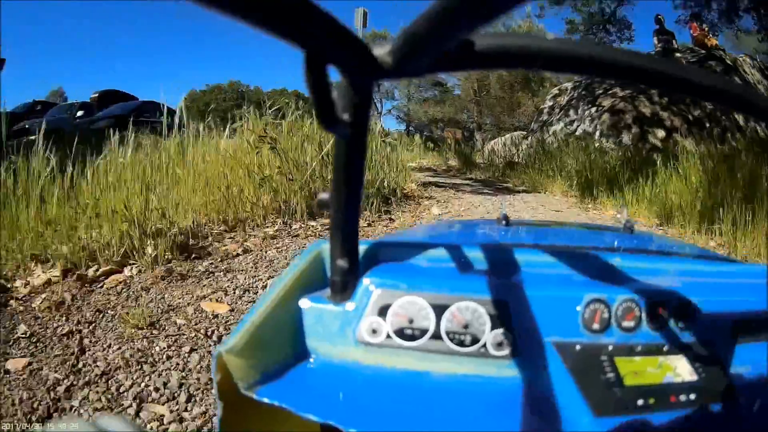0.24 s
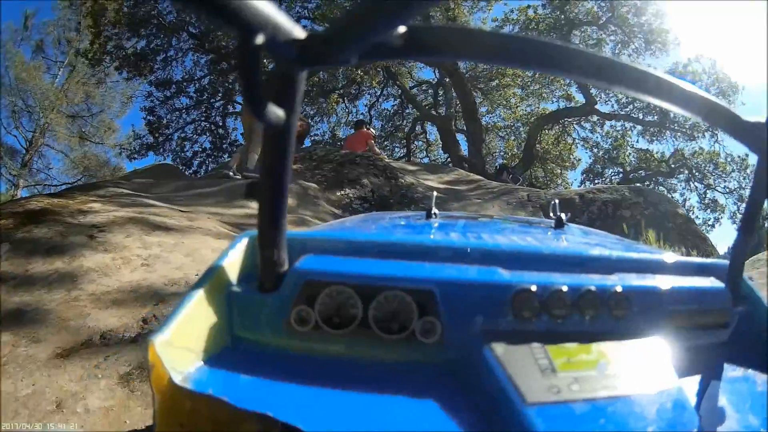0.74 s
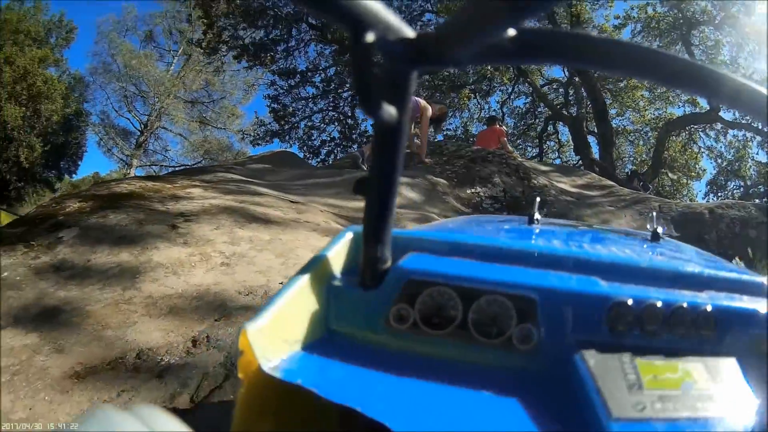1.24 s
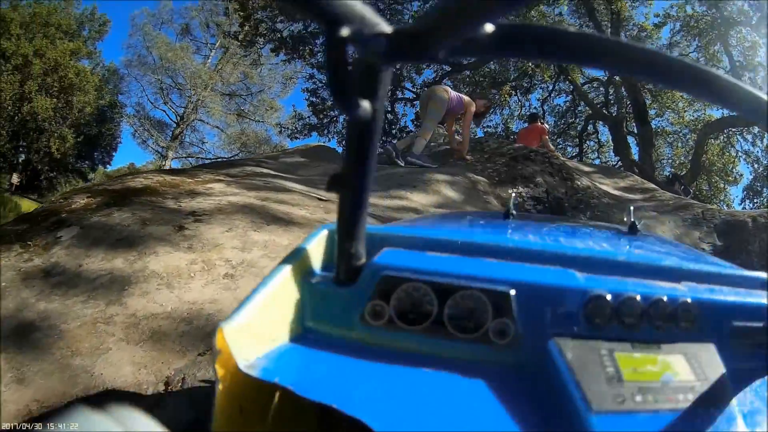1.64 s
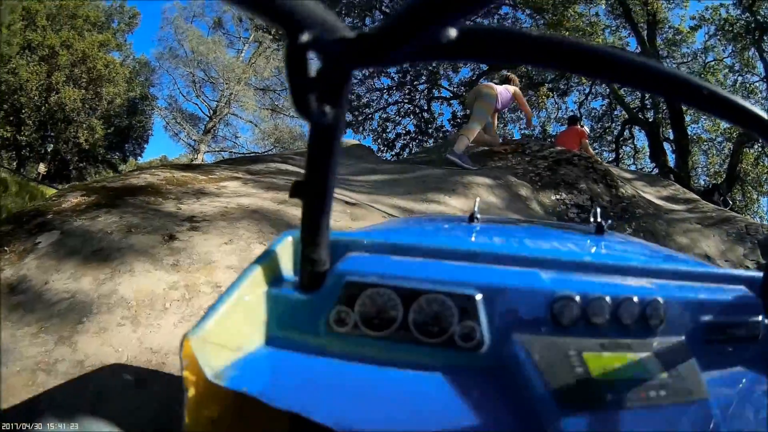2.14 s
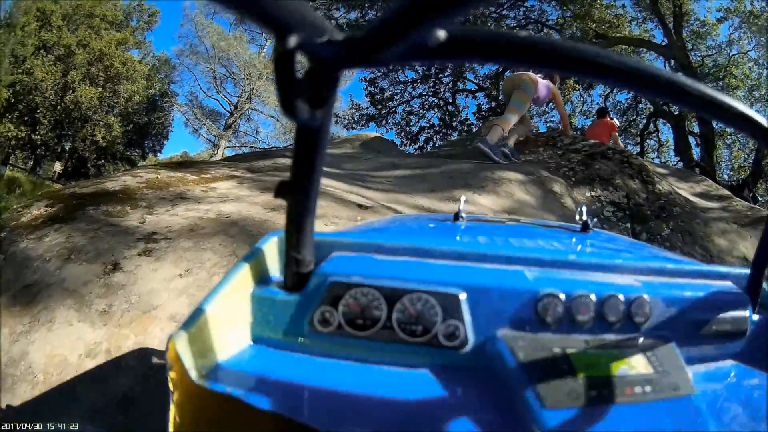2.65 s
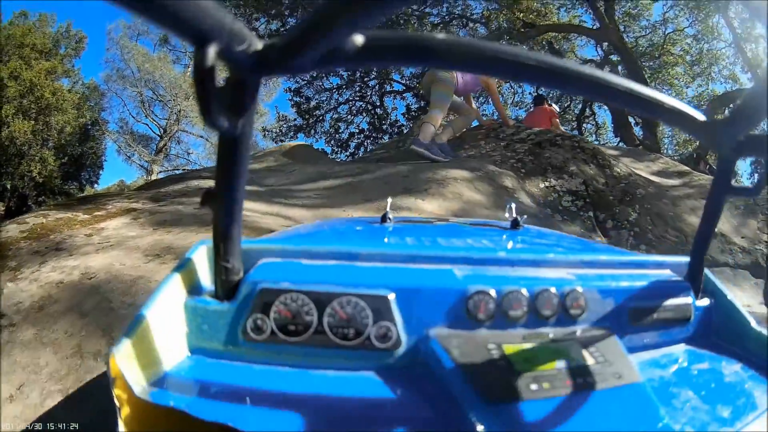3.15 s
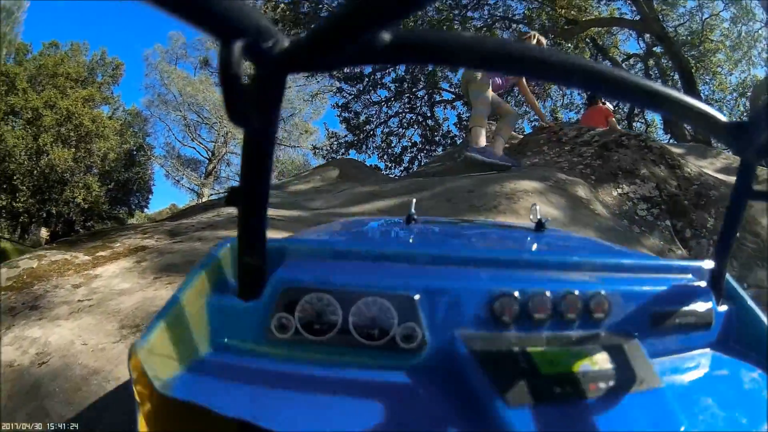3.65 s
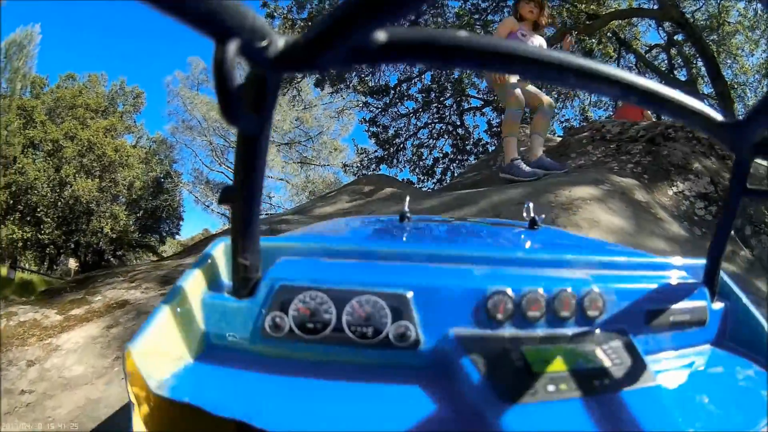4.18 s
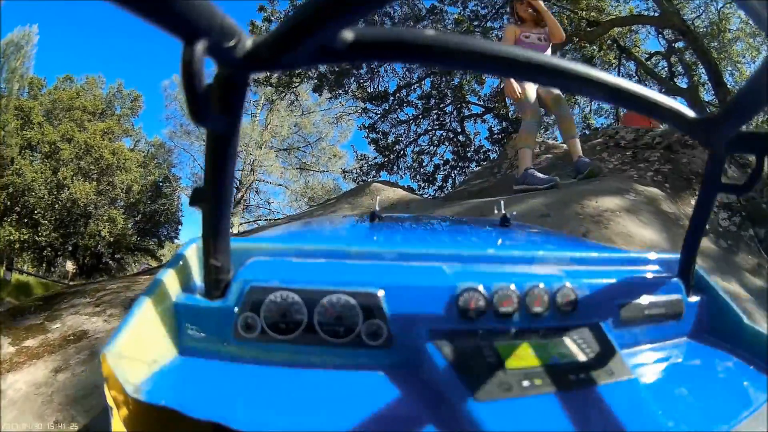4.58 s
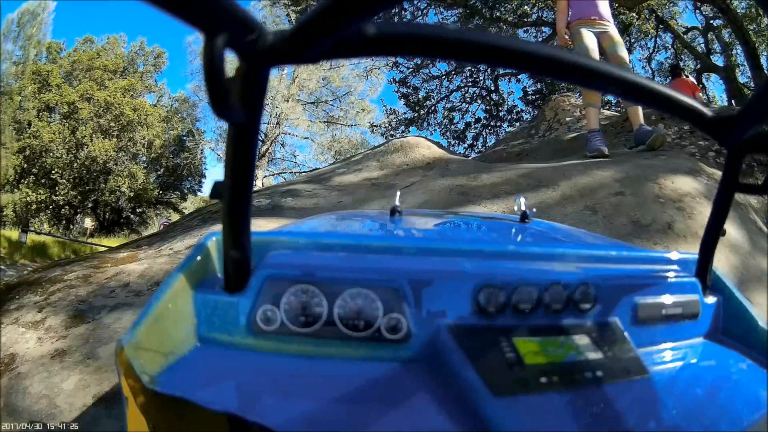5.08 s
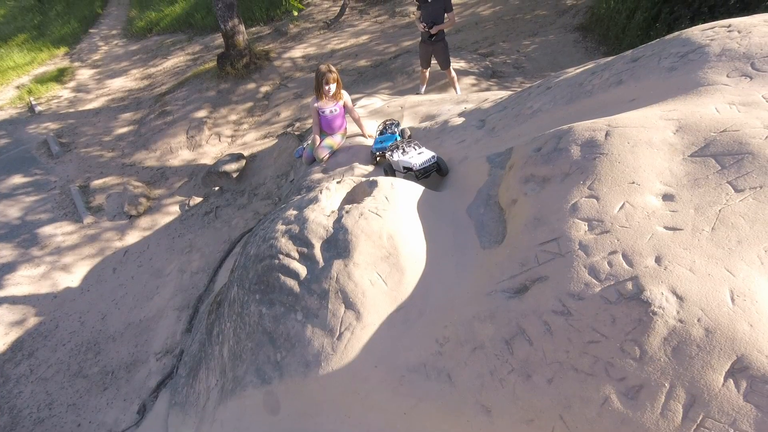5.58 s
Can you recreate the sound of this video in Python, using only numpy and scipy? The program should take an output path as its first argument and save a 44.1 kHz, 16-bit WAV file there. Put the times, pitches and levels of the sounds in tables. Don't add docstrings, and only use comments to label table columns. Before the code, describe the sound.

A small electric model crawler whirs harshly over gravel, then whines in a warbling, surging pitch up rock, then drops to a faint distant hum.

```python
import sys
import numpy as np
from scipy import signal
from scipy.fft import rfft, irfft, next_fast_len
from scipy.io import wavfile
from scipy.ndimage import uniform_filter1d, minimum_filter1d, map_coordinates

SR = 44100
rng = np.random.default_rng(int(sys.argv[2]) if len(sys.argv) > 2 else 0)


def put_to_file(sound):
    columns = np.atleast_2d(sound).T
    safe = np.clip(columns, -1, 1)
    whole_steps = np.round(safe * 32767)
    wavfile.write(sys.argv[1], SR, whole_steps.astype(np.int16))


def amplitude_ratio(level_db):
    exponent = np.asarray(level_db, float) / 20
    return 10 ** exponent


N = 256657
T = np.arange(N) / SR

# start in seconds, end in seconds.
SHOTS = [
    (0, .419),
    (.419, 5.151),
    (5.151, 5.83),
]
# time in seconds, mean tooth rate in Hz, swing within a shaft turn (0-1).
CLIMB = [(0.419, 556.8, .145), (0.701, 625.7, .136), (1.037, 588.2, .186), (1.145, 528.6, .167),
         (1.488, 680.7, .164), (1.903, 658.7, .163), (2.214, 719.8, .157), (2.6, 882.6, .146),
         (3.244, 915.0, .176), (3.526, 796.6, .169), (3.975, 852.0, .153), (4.38, 709.7, .138),
         (4.544, 787.5, .144), (4.806, 886.8, .152), (5.016, 796.0, .16), (5.15, 818.0, .15),
         (5.151, 553, .145)]
# time in seconds, tooth load in dB, winding song in dB.
EFFORT = [(0.0, -2, -65), (0.41, -3.5, -50), (0.425, -1, -46), (1.18, -0.2, -44), (1.3, 1, -50.5),
          (2.45, 1, -51.5), (3.1, -2, -51.5), (3.8, 0.4, -50.5), (5.14, -1.1, -51.5), (5.16, -4, -71),
          (5.8, -4.5, -67)]


def along(points, hz):
    f, v = np.transpose(points)
    return np.interp(np.log(hz + 1), np.log(f + 1), v)


def unit(x):
    return x / np.sqrt(np.mean(x ** 2) + 1e-20)


def wobble(rate):
    coarse = T[::16]
    knots = rng.standard_normal(int(N * rate / SR) + 4)
    return np.interp(T, coarse, map_coordinates(knots, [coarse * rate]))


def filtered(x, response):
    m = next_fast_len(N + 8192)
    return irfft(rfft(x, m) * response(np.fft.rfftfreq(m, 1 / SR)), m)[..., :N]


def by_shot(values):
    return sum(((T >= a) & (T < b)) * v for (a, b), v in zip(SHOTS, values))


def column(rows, index):
    return np.interp(T, *np.transpose(rows)[[0, index]])


def tone(hz, db):
    return np.sqrt(2) * amplitude_ratio(db) * np.sin(2 * np.pi * (np.cumsum(hz * np.ones(N)) / SR + rng.random()))


def worn(line_hz, db, wear, rate):
    turn = 2 * np.pi * (np.cumsum(line_hz * np.ones(N)) / SR + rng.random())
    in_phase = (1 + wear * wobble(rate)) * np.sin(turn)
    quadrature = wear * wobble(rate) * np.cos(turn)
    return amplitude_ratio(db) * (in_phase + quadrature) / np.sqrt(.5 + wear ** 2)


def coloured(drive, spectra, lo_hz, hi_hz):
    bins_hz = np.fft.rfftfreq(4096, 1 / SR)
    inside = (bins_hz > lo_hz) & (bins_hz < hi_hz)
    layers = []
    for spectrum in spectra:
        power = np.sum(amplitude_ratio(along(spectrum, bins_hz)[inside]) ** 2) / len(bins_hz)
        layers.append(filtered(drive, lambda hz: amplitude_ratio(along(spectrum, hz))) / np.sqrt(power))
    return by_shot(layers)


def pace():
    # time in seconds, twice the tooth rate in Hz.
    sprint = [
        (0.0, 3200),
        (0.12, 3100),
        (0.175, 2920),
        (0.21, 3150),
        (0.255, 3320),
        (0.28, 3050),
        (0.335, 2880),
        (0.4, 3020),
        (0.419, 3080),
    ]
    return np.where(T < SHOTS[1][0], column(sprint, index=1) / 2, column(CLIMB, index=1))


def tooth_rate():
    start_turns = (0, -.063, -.19)
    flutter = (.025, .006, .003)
    teeth_per_turn, lopsided, lopsided_rad = 113.393, .0185, -1.34
    mean = pace()
    turns = np.cumsum(mean) / SR / teeth_per_turn
    since_cut = [turns - turns[round(a * SR)] + at for (a, b), at in zip(SHOTS, start_turns)]
    angle = 2 * np.pi * by_shot(since_cut)
    swing = lopsided * np.cos(2 * angle + lopsided_rad) - column(CLIMB, index=2) * np.cos(angle)
    on_rock = T >= SHOTS[1][0]
    return mean * (1 + on_rock * swing + by_shot(flutter) * wobble(45))


def frame_db(hz):
    # centre in Hz, width in Hz, gain in dB.
    chassis = [(500, 120, -0.5), (590.5, 33, 0), (871, 72, 4.5), (1098, 101, 4), (1319.5, 78, 0),
               (1598, 114, -2), (1922, 208, 2), (2400, 108, -3.5), (2864, 150, -1), (3326, 357, 2.5),
               (4540, 160, 4)]
    modes = sum(amplitude_ratio(db) ** 2 / (1 + (2 * (hz - c) / w) ** 2) ** 1.213 for c, w, db in chassis)
    return 10 * np.log10(modes / (1 + (hz / 3600) ** 12))


def gears(rate, distance_db):
    # multiple of the tooth rate, level in dB, wear as sideband depth.
    orders = [(.25, -33, .6), (1, -28.5, .4), (2, -26, .4), (3, -35.5, .5), (4, -42, .6), (5, -44, .8),
              (6, -46, 1.0)]
    load_db = column(EFFORT, index=1) + distance_db
    shake = by_shot([5, 1.01, .4])
    whine = 0
    for k, db, wear in orders:
        level_db = db + load_db + frame_db(k * rate) + 2 * wobble(20)
        whine = whine + worn(k * rate, level_db, wear * shake, 200)
    return whine


def windings(rate, distance_db):
    # multiple of the switching rate, level in dB.
    overtones = [(1, -37.5), (2, -44), (5, -83), (8, -62.5)]
    switch_hz = 979.3
    slot_hz = .152 * rate
    lines = sum(tone(k * switch_hz, db + distance_db + 3.0 * wobble(5.44)) for k, db in overtones)
    sixth = tone(6 * switch_hz, column(EFFORT, index=2) + 1.42 + 1.0 * wobble(24.6))
    below = worn(switch_hz - slot_hz, by_shot([-55, -33, -70]), 0.14, 70)
    above = worn(switch_hz + slot_hz, by_shot([-55, -42, -74]), 0.07, 70)
    far_song = tone(5911 + 12 * wobble(9), by_shot([-99, -99, -72]) + 3 * wobble(12))
    return lines + sixth + below + above + far_song


def noise_db(index):
    # rumble in dB, shell in dB, rattle in dB.
    levels = [
        (-34.5, -28.5, -37.5),
        (-42.5, -37.5, -47),
        (-54, -62.5, -68),
    ]
    grows_db = (4, 3, 5)
    cruise_hz = (1550, 700, 553)
    return by_shot(np.transpose(levels)[index]) + grows_db[index] * np.log2(pace() / by_shot(cruise_hz))


def body(rate):
    # frequency in Hz, density in dB per Hz.
    rumble_colour = [
        [(13, -33), (22, 6), (69, 3.5), (139, 3.5), (188, 3), (411, 4.5), (500, 0), (650, -33), (1100, -120)],
        [(13, -44), (22, -41), (54, -1.5), (146, -15), (228, -7), (375, -5), (500, -12), (650, -26),
         (1100, -120)],
        [(13, -51), (22, -17), (98, -33), (134, -7), (150, 1), (167, -4), (300, -13), (500, -30), (650, -48),
         (1100, -120)],
    ]
    shell_colour = [
        [(210, -38), (350, -1), (410, -5), (754, -5.5), (873, -6.5), (1000, 0), (1440, 0), (1540, -13),
         (1860, 2.5), (2390, -10.5), (2990, 0.5), (4100, -20.5), (5200, -33.5), (6760, -54), (11400, -120)],
        [(210, -24), (350, -15.5), (538, -12.5), (754, -8), (883, -2), (1120, -3.5), (1200, -6), (1970, -7.5),
         (2160, -13.5), (3310, -19), (4100, -36), (4490, -30.5), (5200, -38), (6760, -66), (11400, -120)],
        [(210, -42), (350, -3), (569, 2), (826, -5), (967, 1.5), (1660, -6.5), (1950, 0), (2280, -10.5),
         (3020, -10.5), (5200, -22), (6760, -58), (11400, -120)],
    ]
    rattle_colour = [
        [(2650, -52), (4500, -24), (5050, -15), (5990, -0.5), (6870, -11), (8820, -0.5), (10400, -12),
         (12300, -13.5), (13600, -20), (14900, -23), (15600, -39)],
        [(3500, -44), (4800, -22), (5900, -8.5), (6870, -13.5), (7900, -6.5), (9080, -1), (10400, -16.5),
         (11300, -13.5), (13000, -17.5), (14500, -21), (15600, -60)],
        [(3500, -28), (5000, -9), (6200, 4), (12500, -3.5), (14000, -7), (15300, -8), (15700, -30)],
    ]
    lead_s = 0.0034
    near = by_shot([.3, 1.01, .1])
    octaves = np.roll(np.log2(rate / pace()), -round(lead_s * SR))
    surge = near * np.clip(octaves, -.35, .35)

    rumble_db = noise_db(index=0) + 0.92 * surge + 0.74 * wobble(14)
    rumble = coloured(rng.standard_normal(N), rumble_colour, 40, 700) * amplitude_ratio(rumble_db)

    buzz = unit(rng.standard_normal(N) * amplitude_ratio(1.3 * near * wobble(120)))
    shell_db = noise_db(index=1) - 2.5 + 8.8 * surge + 0.65 * wobble(25.3)
    shell = coloured(buzz, shell_colour, 2050, 3260) * amplitude_ratio(shell_db)

    ticks = (rng.random(N) < .008) * rng.standard_normal(N) * amplitude_ratio(1.3 * rng.exponential(size=N))
    hiss = rng.standard_normal(N) * amplitude_ratio(2.04 * near * wobble(150))
    grit = unit(hiss + 0.51 * near * unit(ticks))
    rattle_db = noise_db(index=2) + 8.6 * surge + 0.22 * near * wobble(30)
    rattle = coloured(grit, rattle_colour, 7670, 10700) * amplitude_ratio(rattle_db)
    return rumble + shell + rattle


def squeaks():
    # time in seconds, peak level in dB, length in ms, pitch in Hz.
    chirps = [(0.017, -18, 1.5, 8900), (0.068, -24, 1.5, 8300), (0.086, -22, 1.9, 11760),
              (0.095, -21, 2, 8900), (0.138, -19, 7.1, 8650), (0.159, -33, 2, 11300),
              (0.236, -14, 0.76, 8570), (0.259, -35, 1.8, 8760), (0.308, -24, 1.6, 10900),
              (0.312, -25, 2.2, 8200), (0.384, -22, 0.74, 8500), (1.09, -37, 1.9, 10700),
              (2.135, -32, 3, 8900), (2.253, -33, 1.7, 7940), (2.438, -37, 3.4, 10100),
              (2.57, -40, 2.1, 13850), (2.71, -30, 7.2, 14200), (2.954, -30, 4.5, 8470),
              (3.178, -23.5, 6.5, 8500), (3.203, -59, 2.3, 9270), (3.327, -29.5, 4.9, 9200),
              (4.018, -23, 2.2, 14200), (4.317, -27, 8.5, 14400), (4.617, -26, 8.5, 14200),
              (4.719, -37.5, 6.0, 7210), (4.735, -35, 2.1, 14420), (4.759, -38, 1.2, 4870),
              (4.879, -33, 9, 13700), (5.356, -48, 2.3, 2900), (5.76, -55, 1.5, 5000)]
    rise_hz, droop_hz = 222, -70
    snap_level = 2.4
    out, t = np.zeros(N + 4096), np.arange(-2048, 2048) / SR
    for s, db, ms, hz in chirps:
        life, sags = ms / 1000, hz > 13000
        glide = (droop_hz if sags else rise_hz) * t * t / life
        sag = sags * 600 * t ** 3 / (3 * life ** 2)
        phase = 2 * np.pi * (hz * t + glide + sag)
        chirp = np.exp(-np.where(sags, 2.2, 2.8) * (t / life) ** 2) * np.sin(phase)
        snaps = ms < 2.6 and not sags
        noise = uniform_filter1d(rng.standard_normal(4096), size=12)
        snap = snaps * snap_level * np.exp(-5 * (t / life) ** 2) * noise * np.cos(phase)
        out[round(s * SR):][:4096] += amplitude_ratio(db + 3.0) * (chirp + snap)
    return filtered(out[2048:][:N], lambda hz: 1 / np.sqrt(1 + (hz / 13500) ** 8 + (2600 / (hz + 1)) ** 8))


def servo():
    # time fastest in seconds, half length in seconds, top pitch in Hz, fall in Hz.
    s, half, top_hz, fall_hz = (.903, .05, 2150, 1050)
    u = np.clip((T - s) / half, -1, 1)
    pitch = top_hz - fall_hz * np.sin(np.pi * u / 2) ** 2
    # frequency in Hz, level in dB.
    bright = [(2000, -56), (4300, -52), (6000, -54), (8500, -44), (10500, -51), (13000, -64), (16000, -90)]
    stack = sum(worn(k * pitch, along(bright, k * pitch) + 4 * wobble(89.3), 0.46, 600) for k in range(2, 8))
    return stack * np.sqrt(1 - u ** 6)


def scene():
    # frequency in Hz, side under mid in dB.
    side_db = [(40, -21), (125, -24), (400, -28), (700, -32), (1290, -24), (2380, -22), (4400, -15),
               (8000, -18), (15000, -12)]
    rate = tooth_rate()
    distance_db = by_shot([-2.5, 0, -29.5])
    mid = gears(rate, distance_db) + windings(rate, distance_db) + body(rate) + squeaks() + servo()
    late = np.roll(mid, 300) * np.sign(wobble(46))
    side = filtered(.7 * late - .45 * mid, lambda hz: amplitude_ratio(along(side_db, hz)))
    return np.array([mid + side, mid - side])


def thinned(x):
    thin_hz, thin_db, scatter_db = 10200, -52.5, 4.5
    hz, _, z = signal.stft(x, SR, nperseg=512)

    def smear(grid):
        return uniform_filter1d(uniform_filter1d(grid, size=3, axis=0), size=9, axis=1)

    power = smear(np.abs(z).mean(axis=0) ** 2)
    scatter = unit(smear(rng.standard_normal(power.shape)))
    bar = power.sum(axis=0) * amplitude_ratio(thin_db + scatter_db * scatter) ** 2
    kept = (power > bar) | (hz[:, None] < thin_hz)
    return signal.istft(z * kept, SR, nperseg=512)[1][:, :N]


def band_limit(x):
    return signal.sosfilt(signal.butter(12, 15800, fs=SR, output="sos"), x)


def record(dry):
    need = np.minimum(1, 0.27 / (np.abs(dry).max(axis=0) + 1e-9))
    gain = uniform_filter1d(minimum_filter1d(need, size=200), size=100)
    limited = filtered(dry * gain, lambda hz: np.clip((15800 - hz) / 250, 0, 1))
    return band_limit(thinned(limited))


dry = scene()
out = record(dry)
put_to_file(out)
```